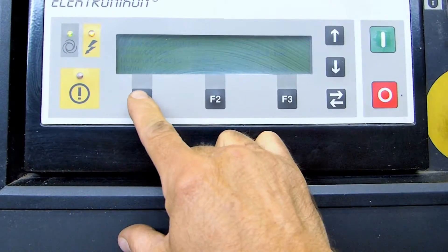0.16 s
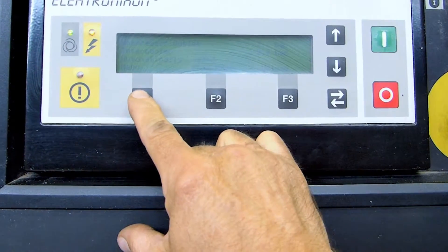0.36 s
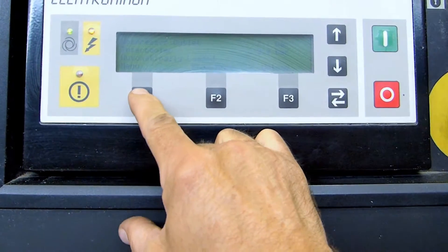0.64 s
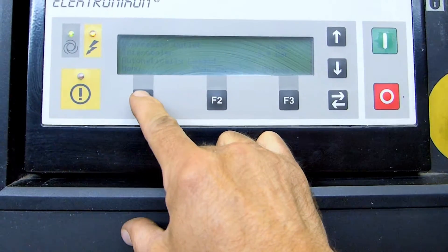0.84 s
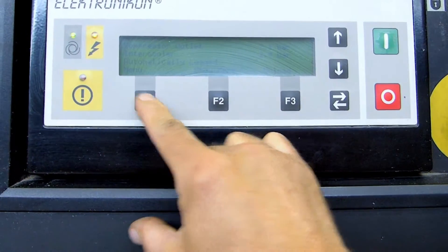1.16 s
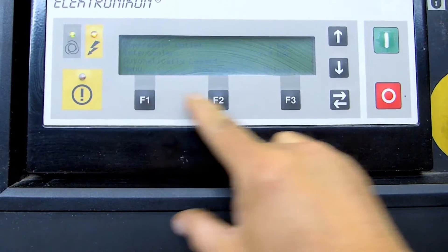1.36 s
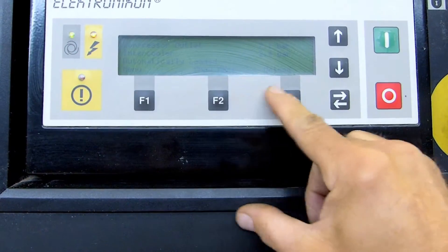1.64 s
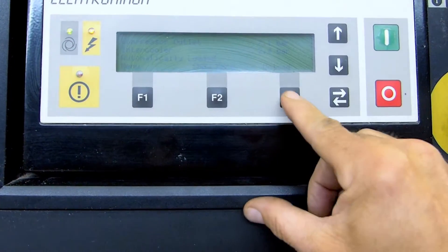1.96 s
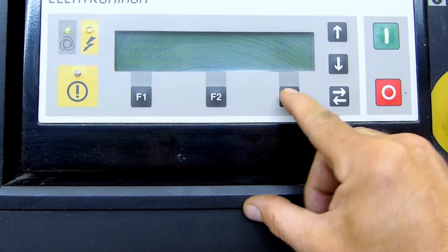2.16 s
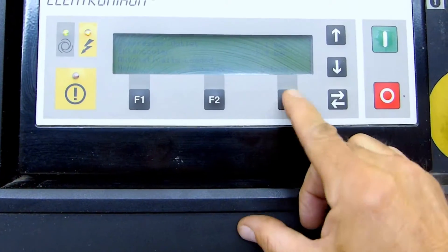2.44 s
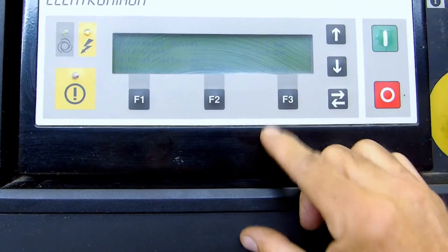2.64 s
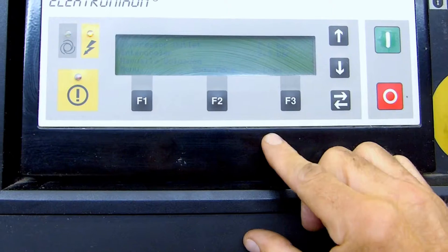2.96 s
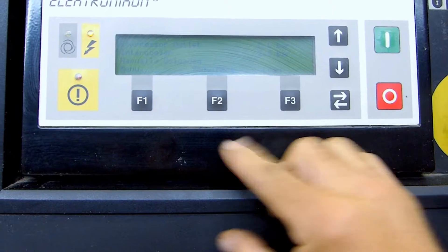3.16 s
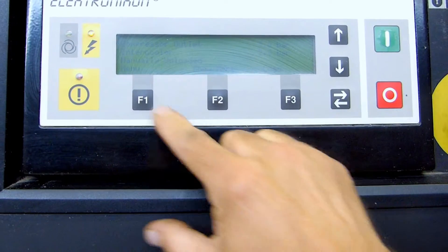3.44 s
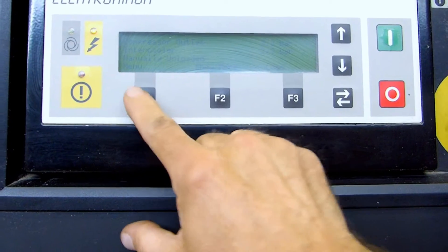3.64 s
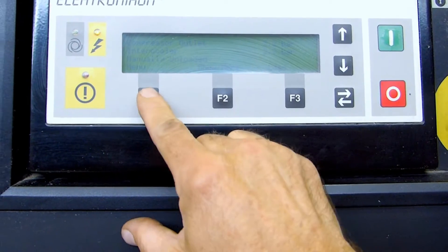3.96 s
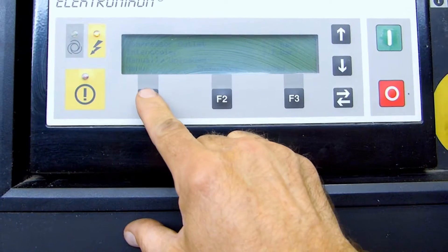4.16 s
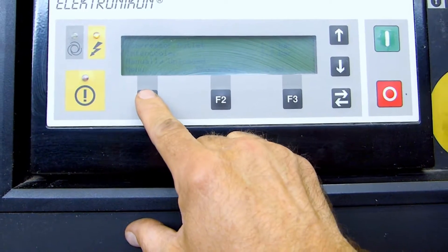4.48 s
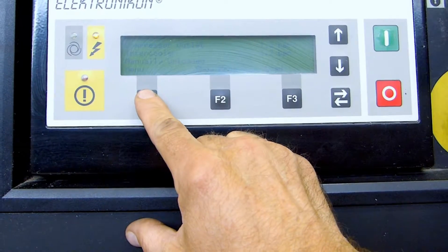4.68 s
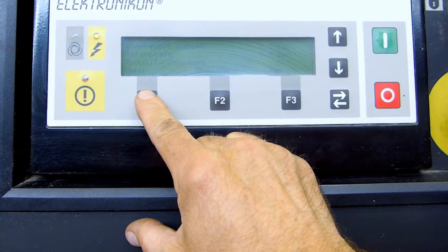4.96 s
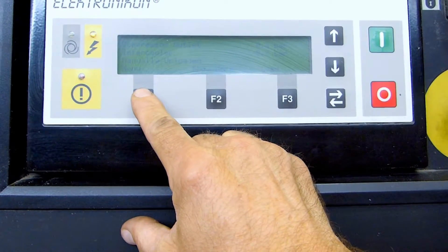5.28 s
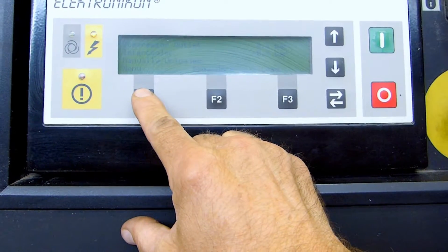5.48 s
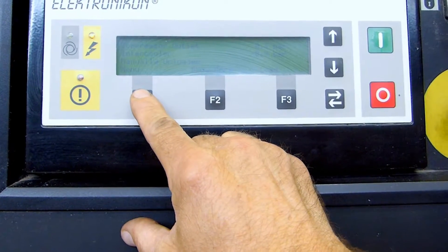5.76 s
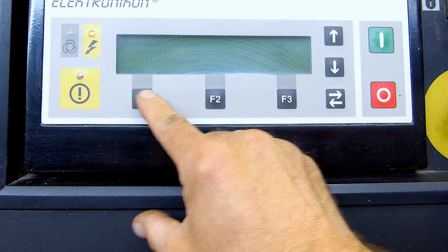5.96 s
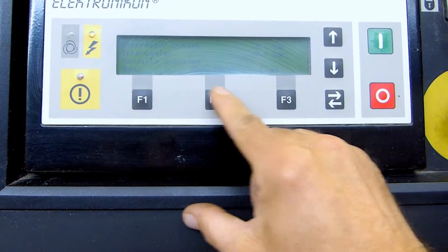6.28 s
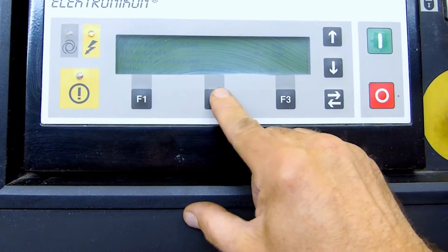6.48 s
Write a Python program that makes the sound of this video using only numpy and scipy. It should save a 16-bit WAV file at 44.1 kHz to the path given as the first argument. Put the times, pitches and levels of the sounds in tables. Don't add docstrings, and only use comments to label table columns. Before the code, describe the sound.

Close in a plant room, a loud, bright, steady air jet hisses from a large screw compressor, masking its machinery. Around three seconds the hiss dulls into a lower roar with airy whistling bursts. Gear and rotor tones swell in turn, the rotors shudder twice, and the air shuts off near five seconds. Hum, whine and broad fan noise remain, steady to the end.

```python
import sys
import numpy as np
from scipy import signal
from scipy.io import wavfile
from scipy.ndimage import uniform_filter1d

SR = 44100
rng = np.random.default_rng(int(sys.argv[2]) if len(sys.argv) > 2 else 0)


def put_to_file(sound):
    columns = np.atleast_2d(sound).T
    safe = np.clip(columns, -1, 1)
    whole_steps = np.round(safe * 32767)
    wavfile.write(sys.argv[1], SR, whole_steps.astype(np.int16))


def boost(x):
    u = np.asarray(x, float) / 20
    return 10 ** u


N = 291501


def rms_one(x):
    return x / np.sqrt(np.mean(x ** 2) + 1e-20)


def drift(rate):
    r = np.exp(-80 * np.pi * rate / SR)
    white = rng.standard_normal(N // 40 + 2002)
    slow = signal.lfilter([1], [1, -2 * r, r * r], white)[2000:]
    return np.interp(np.arange(N) / 40, np.arange(len(slow)), rms_one(slow))


def band_pass(low_hz, high_hz, x):
    return signal.sosfilt(signal.butter(2, [low_hz, high_hz], "band", fs=SR, output="sos"), x)


def whistles(modes):
    out, white = 0, rng.standard_normal(N)
    for hz, width, db in modes:
        r = np.exp(-np.pi * width / SR)
        section = [1, 0, -1, 1, -2 * r * np.cos(2 * np.pi * hz / SR), r * r]
        out = out + boost(db) * rms_one(signal.sosfilt([section, section], white))
    return out


def noise_bands(spectrum, patchy_db):
    edges = 25 * 2 ** np.arange(0, 9.5, 1 / 3)
    white, shared = rng.standard_normal((2, N)), drift(3.3)
    hz = np.sqrt(edges[1:] * edges[:-1])
    points, db = np.transpose(spectrum)
    levels = np.interp(np.log(hz), np.log(points), db)
    bands = []
    for k, level in enumerate(levels):
        flicker_db = patchy_db * (0.097 * shared + drift(9.1))
        bands.append(boost(level + flicker_db) * band_pass(edges[k], edges[k + 1], white[k % 2]))
    return hz, np.array(bands) / np.std(np.sum(bands, axis=0))


def plateau(start, end, rise, fall):
    t = np.arange(N) / SR
    return -rise * np.maximum(start - t, 0) - fall * np.maximum(t - end, 0)


def swell_levels(rows):
    rise_db_per_s, fade_db_per_s = 55, 110
    dip = np.exp(-((np.arange(N) / SR - 4.1) / .11) ** 2)
    out = {}
    for multiple, start, end, db, dip_db in rows:
        level_db = db + dip_db * dip + plateau(start, end, rise_db_per_s, fade_db_per_s)
        out[multiple] = out.get(multiple, 0) + boost(level_db)
    return out


def tones(loaded_hz, unloaded_hz, steady, swells, gain, flicker_db):
    unload_s, unload_span_s = 3.85, .7
    unloaded = .5 + .5 * np.tanh((np.arange(N) / SR - unload_s) / unload_span_s)
    turns = np.cumsum(loaded_hz + (unloaded_hz - loaded_hz) * unloaded) / SR
    out = 0
    for multiple in sorted({*steady, *swells}):
        level = gain * boost(steady.get(multiple, -200)) + swells.get(multiple, 0)
        wobble = rng.random() + 0.02 * drift(12)
        sine = np.sqrt(2) * np.sin(2 * np.pi * (multiple * turns + wobble))
        out = out + level * boost(flicker_db * drift(9.0)) * sine
    return out


def handling():
    t = np.arange(N) / SR
    shift_db = 9 * np.exp(-((t - 3.64) / 0.2) ** 2)
    still_db = -10.0 * np.clip((t - 4.4) / .3 + .5, 0, 1)
    rumble = band_pass(15, 40, rng.standard_normal(N))
    return boost(-74.5 + shift_db + still_db) * rms_one(rumble)


# frequency in Hz, density in dB per Hz.
FAN_AIR = [(30, -38), (70, -17), (200, 3), (450, -2.5), (750, 2.5), (1200, -4.5), (1900, -9), (3000, -14.5),
           (4000, -16), (4600, -12.5), (6500, -21.5), (9300, -23.5), (11500, -32.5), (16000, -48)]
# frequency in Hz, width in Hz, level in dB.
CASING_PANELS = [(775, 27, -13.5), (1015, 66, -30), (383.5, 21, -17), (4004, 230, -12.5), (630, 37, -12.5)]


def fan():
    air = noise_bands(FAN_AIR, patchy_db=0.8)[1].sum(axis=0)
    return boost(-39.5) * (air + whistles(CASING_PANELS))


MOTOR_HUM = {5: -53.5, 7: -53.5, 9: -56.5, 12: -69, 13: -51.5, 18: -64}
# multiple, start in seconds, end in seconds, level in dB, change during the first shudder in dB.
MOTOR_RESONANCES = [
    (13, 4.2, 4.8, -71, 0),
]


def motor(gain):
    return tones(199.6, 199.72, MOTOR_HUM, swell_levels(MOTOR_RESONANCES), gain, flicker_db=1.2)


GEAR_WHINE = {1: -51, 2: -52.5, 3: -55, 4: -61.5, 5: -66, 6: -59, 7: -65, 8: -62}
# multiple, start in seconds, end in seconds, level in dB, change during the first shudder in dB.
GEAR_RESONANCES = [(1, -0.5, 2.73, -53.5, 1), (1, 3, 3.95, -43.5, -4), (1, 4.1, 4.77, -46.5, -7),
                   (3, 3.45, 4.18, -47.5, 0), (3, 4.45, 4.46, -44, -1), (3, 4.65, 4.7, -52, 0),
                   (3, 4.8, 5.4, -59, 0), (4, 3, 3.5, -45.5, 0), (4, 5, 4.22, -46, 0),
                   (4, 4.5, 4.8, -49, 0), (5, 3.5, 4.55, -52, 0), (6, 2.6, 3.5, -48, 0),
                   (6, 3.5, 4.7, -39, -16), (6, 5.4, 5.7, -60, 0), (7, 3, 4.2, -47.5, 0),
                   (8, 5.15, 5.3, -69, 0)]


def gears(gain):
    return tones(675.1, 679.5, GEAR_WHINE, swell_levels(GEAR_RESONANCES), gain, flicker_db=1.3)


ROTOR_HUM = {1: -57.5, 2: -47.5, 3: -52.5, 4: -52.5, 5: -61.5, 12: -47, 20: -54, 24: -65, 28: -58, 32: -62,
             36: -59.5, 39: -75, 40: -51, 41: -60, 43: -66, 52: -68, 53: -67, 56: -65, 60: -83, 64: -69}
# multiple, start in seconds, end in seconds, level in dB, change during the first shudder in dB.
ROTOR_RESONANCES = [
    (4, 3.65, 3.85, -57, 0),
    (7.96, 3.8, 4.2, -47, 2),
    (20, 3.8, 4.3, -55, 2),
    (24, 3.9, 5.6, -72, -2),
    (28, 4.8, 5.43, -56, 0),
]
# start in seconds, hold in seconds, level in dB, fall in dB per second.
ROTOR_SHUDDERS = [
    (4.13, .09, -39, 80),
    (5.03, .15, -45.5, 32),
]
SHUDDER_RING = {16: 0, 24: -12, 32: -9, 48: -14}


def rotors(gain):
    rise_db_per_s, lag_s_per_multiple = 85, .0055
    swells = swell_levels(ROTOR_RESONANCES)
    for multiple, tone_db in SHUDDER_RING.items():
        lag, haste = lag_s_per_multiple * (multiple - 16), multiple / 16
        for start, hold, db, fall in ROTOR_SHUDDERS:
            begin = start + lag
            shape_db = haste * plateau(begin, begin + hold / haste, rise_db_per_s, fall)
            swells[multiple] = swells.get(multiple, 0) + boost(tone_db + db + shape_db)
    return tones(103.2, 103.5, ROTOR_HUM, swells, gain, flicker_db=.8)


# frequency in Hz, width in Hz, level in dB, middle in seconds, half length in seconds.
VALVE_WHISTLES = [
    (748, 14, -46, 4.25, 0.5),
    (4670, 1200, -49, 4.6, .15),
    (265, 40, -62, 3.5, 0.57),
    (1630, 460, -38.5, 3.42, 0.34),
    (705, 340, -42, 3.44, 0.21),
    (7100, 830, -60, 6.4, 0.09),
]


def sputter():
    t = np.arange(N) / SR
    out = 0
    for hz, width, db, middle, half in VALVE_WHISTLES:
        out = out + whistles([(hz, width, db)]) * np.exp(-((t - middle) / half) ** 2)
    return out


# time in seconds, level against full pressure in dB.
VENT_DROP = [
    (0, 0.5),
    (2.65, 0),
    (3.0, -3),
    (3.6, -8.5),
    (4.18, -11.5),
    (4.49, -17.5),
    (4.68, -23),
    (4.8, -27.5),
    (4.95, -34.5),
]
REGION_HZ = [130, 650, 1500, 3000, 8000, 14000]
REGION_FOLLOWS = [(0.22, 0.21), (0.037, 0.41), (0.017, 0.8), (0.53, 0.81), (0.95, 0.97), (1.1, 1.22)]
# frequency in Hz, density in dB per Hz.
JET_AIR = [(18, -74), (30, -46), (64, -95), (141, -18.5), (227, -21), (311, -20.5), (345, -12), (384, -18),
           (600, -9.5), (760, -8.5), (844, -7.5), (2980, -5.5), (7870, -1), (13300, -7), (16000, -32.5)]
# frequency in Hz, width in Hz, level in dB.
PIPE_WHISTLES = [(228.2, 26, -36), (4050, 390, -15.5), (4783, 390, -15.5), (8010, 1640, -10)]


def vent():
    t = np.arange(N) / SR
    valve_bites_db = 8.5
    shut_s, tail_db_per_s = 5.07, 38
    drop_db = np.interp(t, *np.transpose(VENT_DROP))
    emptying = np.maximum(drop_db, -valve_bites_db)
    change_db = np.array(REGION_FOLLOWS) @ [emptying, drop_db - emptying]
    hz, bands = noise_bands(JET_AIR, patchy_db=.5)
    place = np.interp(np.log(hz), np.log(REGION_HZ), np.arange(6))
    share = np.clip(1 - np.abs(place[:, None] - np.arange(6)), 0, 1)
    air = np.sum(bands * boost(share @ change_db), axis=0)
    air = air + whistles(PIPE_WHISTLES) * boost(change_db[-2])
    air = signal.sosfilt(signal.butter(2, 105, "high", fs=SR, output="sos"), air)
    air = signal.lfilter(*signal.iirnotch(300, 300 / 23, fs=SR), air)
    return boost(-22 - tail_db_per_s * np.maximum(t - shut_s, 0)) * air


def recorder_gain():
    t = np.arange(N) / SR
    release_db = 6.0 * np.maximum(t - 3.31, 0)
    quiet_db = 5 * np.clip((t - 4.64) / .4, 0, 1)
    return boost(-25 + release_db + quiet_db)


def scene():
    gain = recorder_gain()
    machine = gain * fan() + motor(gain) + gears(gain) + rotors(gain)
    mid = handling() + machine + sputter() + vent()
    return np.array([mid, mid])


def stereo_grain(mid):
    frame, grid = 1024, 480
    side_db, tilt_db, spread_share = -9, 3.5, .31
    place, _, frames = signal.stft(np.pad(mid, (frame - grid, 0)), nperseg=2 * frame)
    band = (np.log(np.arange(frame + 1) + 12) * 11).astype(int)
    mood = 1.9 * uniform_filter1d(rng.standard_normal(frames.shape[1]), size=2)
    low = 1.2 * np.exp(-place / .03)[:, None]
    chance = rng.normal(0, .8, (band.max() + 1, len(mood)))[band]
    apart = chance + mood - low < 3 * (spread_share - .5)
    level = np.exp(uniform_filter1d(np.log(np.abs(frames) + 1e-9), size=25, axis=0))
    level = level * boost(side_db - 1.5 * low + tilt_db * place[:, None] / .3)
    noise = level * apart * np.exp(2j * np.pi * rng.random(frames.shape))
    return signal.istft(noise, nperseg=2 * frame)[1][frame - grid:][:N]


def low_pass(x):
    return signal.sosfilt(signal.butter(12, 15750, fs=SR, output="sos"), x)


def record(dry):
    side = stereo_grain(dry[0])
    offset = -0.0034
    return low_pass(dry + [side, -side] + offset)


dry = scene()
out = record(dry)
put_to_file(out)
```